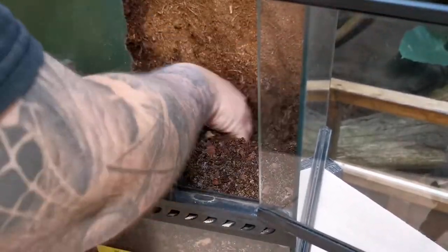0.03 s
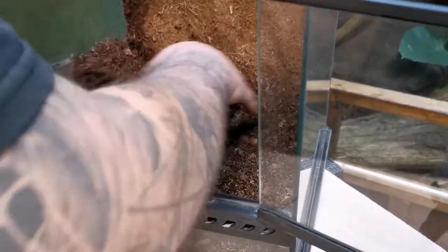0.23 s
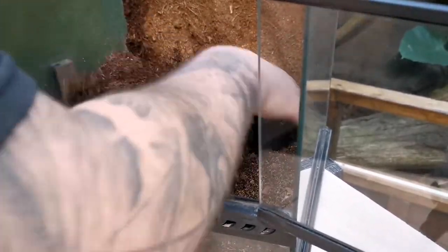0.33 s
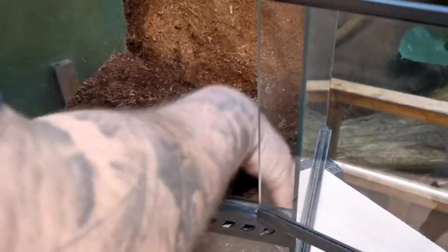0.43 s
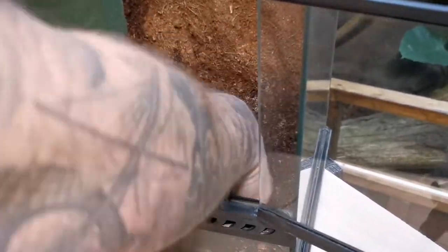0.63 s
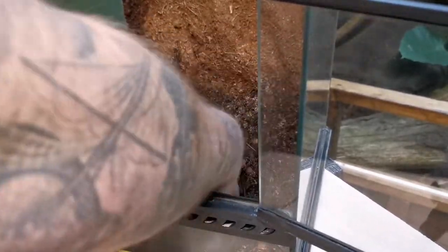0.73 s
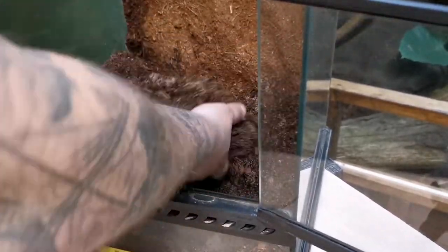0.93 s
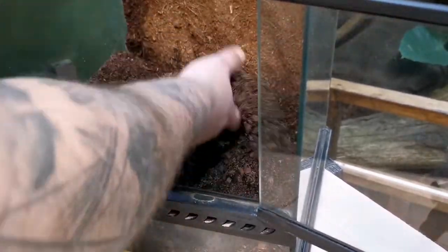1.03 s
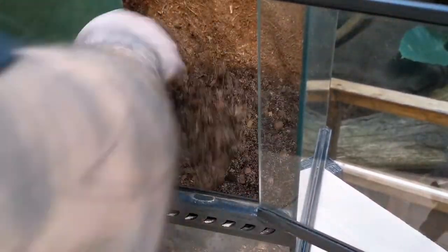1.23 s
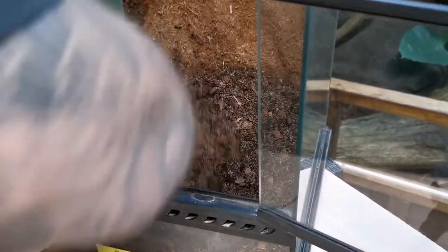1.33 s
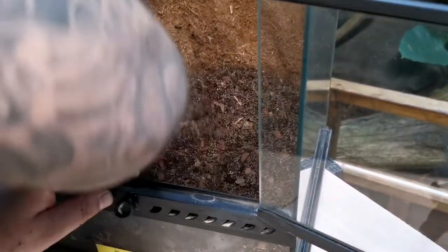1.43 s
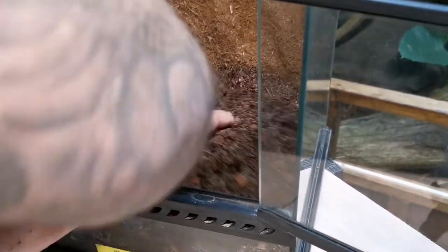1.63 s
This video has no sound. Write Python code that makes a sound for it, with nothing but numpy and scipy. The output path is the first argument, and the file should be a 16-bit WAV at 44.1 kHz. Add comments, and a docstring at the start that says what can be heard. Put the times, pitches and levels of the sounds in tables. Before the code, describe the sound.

Loose soil crunches and hisses under a digging hand, with low knocks against a glass enclosure

```python
"""In a glass enclosure in a small room, a hand close by digs and spreads loose soil, sand and bark chips.
Each stroke is made of random grains: crumbs crunch, sand hisses and the floor pane rumbles.
Thuds ring the enclosure as decaying tones; bark chips snap and scrape in short bursts of grains.
Two handfuls land, and their crumbs patter after them as a fading shower of grains.
Glass resonances, wall reflections, a short room tail and a quiet background surround it all."""
import sys
import numpy as np
from scipy import signal
from scipy.fft import rfft, irfft, next_fast_len
from scipy.io import wavfile

SR = 44100
rng = np.random.default_rng(int(sys.argv[2]) if len(sys.argv) > 2 else 0)


def unload_wav(signal):
    """Save mono or channel-first audio to the path in sys.argv[1] as 16-bit WAV at rate SR, clipped to [-1, 1]."""
    wavfile.write(
        sys.argv[1],
        SR,
        np.round(np.clip(np.atleast_2d(signal).T, -1, 1) * 32767).astype(np.int16),
    )


N = 74970  # length of the scene in samples


def amp(db):
    """Turn decibels into a gain."""
    return 10 ** (np.asarray(db) / 20)


def unit(x):
    """Scale a sound to an average (rms) strength of 1."""
    return x / np.sqrt(np.mean(x ** 2) + 1e-20)


def along(points, hz):
    """Read a value at each frequency from (Hz, value) points, on a log frequency axis."""
    point_hz, value = np.transpose(points)
    return np.interp(np.log(hz + 1), np.log(point_hz + 1), value)


def decay(t, t60):
    """A level that falls by 60 dB in t60 seconds."""
    return np.exp(-np.log(1000) * t / t60)


def struck(start, attack, t60):
    """An envelope that is silent before start (s), then rises and dies away."""
    t = np.maximum(np.arange(N) / SR - start, 0)
    return (1 - np.exp(-t / attack)) * decay(t, t60)


def filtered(x, response):
    """Multiply the spectrum of x by a response, given as a function of frequency."""
    size = next_fast_len(N + SR // 2)  # spare room so that the end does not wrap round
    spectrum = rfft(x, size) * response(np.fft.rfftfreq(size, 1 / SR))
    return irfft(spectrum, size)[..., :N]


def spread(pair):
    """Mix two unrelated signals to left and right: alike in the bass, unrelated in the treble."""
    # How alike left and right are: (frequency [Hz], likeness [0 to 1])
    likeness = [(40, .85), (150, 0.92), (400, 0.95), (1000, 0.8), (2000, 0.72), (4000, 0.31), (7000, 0),
                (14000, 0.019)]

    def mid_and_side(hz):
        angle = np.arccos(np.clip(along(likeness, hz), -1, 1)) / 2
        return np.array([np.cos(angle), np.sin(angle)])

    mid, side = filtered(pair, mid_and_side)
    return np.array([mid + side, mid - side])


def grains(per_s, colour_db):
    """Tiny random contacts of uneven size, coloured by a filter, in stereo at rms 1."""
    scatter_db, pan_scatter = 1.5, 0.12
    hit = rng.random(N) < per_s / SR
    size = amp(scatter_db * np.minimum(rng.exponential(size=N), 4))  # the cap limits rare big grains
    sign = rng.choice([-1, 1], (2, N))
    pan = np.exp(pan_scatter * rng.standard_normal((2, N)))
    pair = hit * size * sign * pan
    return unit(spread(filtered(pair, lambda hz: amp(colour_db(hz)))))


def strokes():
    """The hand ploughs through the soil: crumbs crunch, sand hisses, the pane rumbles."""
    # Hand strokes, one list each, before the trims below:
    # (time [s], crunch level [dB], sand level [dB], rumble level [dB])
    stroke_list = [
        [(0.0, -54.5, -50.5, -39), (0.05, -75.5, -78, -59), (0.11, -62, -65, -51.5), (0.15, -55, -58, -45.5),
         (0.21, -59.5, -56.5, -44.5), (0.24, -48.5, -48, -48.5), (0.272, -61, -54, -60),
         (0.30, -55, -46, -57.5), (0.35, -74, -60, -58), (0.41, -70, -84, -68.5)],
        [(0.50, -66, -59.5, -45), (0.565, -60, -62, -53.5), (0.60, -55, -66, -45), (0.685, -59, -57, -51),
         (0.73, -49, -52.5, -46), (0.81, -53, -46.5, -50.5), (0.855, -46.5, -49.5, -41), (0.89, -49, -49, -55),
         (0.925, -52, -69, -45.5), (1.0, -71.5, -71.5, -78)],
        [(1.03, -79, -87, -69.5), (1.10, -75.5, -78.5, -71.5), (1.15, -68.5, -70.5, -64.5),
         (1.22, -77, -79.5, -74), (1.32, -75.5, -72, -77), (1.36, -63, -69, -60)],
        [(1.46, -60, -68, -48), (1.52, -72, -87, -62), (1.57, -62, -66.5, -56), (1.625, -55, -60, -45),
         (1.67, -52, -56.5, -49.5), (1.7, -57, -60, -55)],
    ]
    # Colours of the three layers, each: (frequency [Hz], level [dB])
    crunch_colour = [(200, -50), (480, 3.5), (680, -1.5), (1200, 0.5), (1800, -2.5), (2600, -4),
                     (3800, -14), (7000, -39), (12000, -52)]
    sand_colour = [(800, -30), (2000, -6), (3000, -2), (4000, 0.5), (4800, -2), (5900, -2), (7200, -7),
                   (10000, -9.5), (15000, -4.5)]
    rumble_colour = [(40, -13.5), (100, -13), (150, -3), (210, -6), (285, 0.5), (380, -6), (480, -12),
                     (660, -15), (900, -29.5), (3000, -62)]
    fade_db_per_s = 356  # how steeply a stroke fades before its first and after its last time
    crunch_db, sand_db, rumble_db = -1, 0.5, -2.5  # trims
    crunch_per_s, sand_per_s, rumble_per_s = 1300, 2600, 1400  # grains per second

    t, level = np.arange(N) / SR, 0
    for rows in stroke_list:
        times, *columns = np.transpose(rows)
        fade = fade_db_per_s * abs(t - np.clip(t, times[0], times[-1]))
        level = level + amp([np.interp(t, times, column) - fade for column in columns])
    crunch = amp(crunch_db) * grains(crunch_per_s, lambda hz: along(crunch_colour, hz))
    sand = amp(sand_db) * grains(sand_per_s, lambda hz: along(sand_colour, hz))
    rumble = amp(rumble_db) * grains(rumble_per_s, lambda hz: along(rumble_colour, hz))
    return level[0] * crunch + level[1] * sand + level[2] * rumble


def still_room():
    """The quiet background: steady noise, coloured and spread over left and right."""
    # Colour of the background: (frequency [Hz], level [dB])
    background_colour = [(20, -1.5), (45, 4), (90, -11), (160, -8), (300, -27), (1000, -26), (3000, -26.5),
                         (7000, -29), (15000, -23)]
    noise = rng.standard_normal((2, N))
    coloured = filtered(noise, lambda hz: amp(along(background_colour, hz)))
    return amp(-63.5) * unit(spread(coloured))


def thuds():
    """Hand and soil strike the enclosure; a softer contact rings only its low tones."""
    # Blows: (time [s], level [dB], cut-off of the contact [Hz]); a lower cut-off is a softer contact
    blows = [(0.0734, -40, 387), (0.1537, -17, 152), (0.1615, -24, 221), (0.2108, -37.5, 290),
             (0.289, -43.5, 298), (0.4242, -25.5, 790), (0.4316, -23.5, 1050), (0.4489, -33, 1310),
             (0.5875, -37.5, 450), (0.6076, -50.5, 416), (0.712, -43, 445), (1.125, -62, 390),
             (1.38, -18, 264), (1.3987, -28.5, 280), (1.599, -43, 430)]
    # Ringing tones (modes) of the enclosure: (frequency [Hz], level [dB], time to fall 60 dB [s])
    modes = [(151.4, -14.5, 0.16), (180.7, -8, 0.13), (272.7, 4, 0.069), (306.3, -5.5, 0.16),
             (373, -0.5, 0.084), (475.3, -7.5, 0.17), (537, -19.5, 0.22), (668, -2, 0.063),
             (717.6, -10.5, 0.16), (780, -11.5, 0.12), (896, -13, 0.28), (1047, -16.5, 0.14),
             (1132, -14, .1), (1300, -15, 0.068)]
    attack_s, contact_steepness = 0.0023, 7
    phase_spread = 0.085  # radians, sets left and right slightly apart
    radiates_hz = 151  # the panes radiate little below this

    out, t = np.zeros((2, N + SR)), np.arange(SR // 2) / SR
    phases = phase_spread * rng.standard_normal((len(modes), 1, 1)) * np.array([[1], [-1]])
    for start, db, soft_hz in blows:
        first = round(start * SR)
        for (hz, mode_db, t60), phase in zip(modes, phases):
            gain = amp(db + mode_db) / np.hypot(1, (hz / soft_hz) ** contact_steepness)
            envelope = decay(t, t60) * (1 - np.exp(-t / attack_s))
            ring = np.cos(2 * np.pi * hz * t + phase) * envelope
            out[:, first:first + len(t)] += gain * ring
    highpass = signal.butter(2, radiates_hz, "highpass", fs=SR, output="sos")
    return signal.sosfilt(highpass, out[:, :N])


def chips():
    """Bark chips snap, scrape and land: each is a short burst of slips around its own pitch."""
    # Chip sounds: (time [s], level [dB], pitch [Hz], width [octaves], attack [s], time to fall 60 dB [s])
    chip_list = [(0.143, -40.5, 2740, 0.14, 0.0019, 0.024), (0.236, -24.5, 6120, .25, 0.00029, 0.01),
                 (0.243, -56, 5500, 0.36, 0.0025, .06), (0.2837, -36, 5740, 0.48, 0.0031, 0.075),
                 (0.4238, -32, 3500, 0.55, 0.00013, 0.025), (0.4304, -30.5, 4800, 0.44, 0.00066, 0.042),
                 (0.4435, -35, 4400, 0.91, 0.00085, .04), (0.7127, -37.5, 1810, 0.18, 0.0015, 0.05),
                 (0.755, -30, 3910, 0.056, 0.00092, 0.02), (0.7604, -30, 4600, 0.27, 0.0024, 0.054),
                 (0.765, -31.5, 3230, 0.21, 0.0012, 0.05), (0.7742, -29.5, 3950, 0.075, 0.0011, 0.047),
                 (0.788, -34.5, 5370, 0.74, 0.00079, 0.023), (0.848, -32, 2670, 0.32, 0.0071, 0.061),
                 (0.906, -38.5, 820, 0.6, 0.0015, 0.051), (1.022, -54.5, 3500, 0.68, 0.0011, 0.026),
                 (1.088, -58, 2090, .2, 0.0036, 0.046), (1.3632, -36.5, 5660, 0.43, 0.0014, 0.039),
                 (1.3775, -44.5, 2600, .9, 0.00089, .035), (1.402, -41, 5600, 0.45, 0.0005, .025),
                 (1.419, -41, 3400, .6, 0.00082, .025)]
    slips_per_s = 3200
    out = np.zeros((2, N))
    for start, db, pitch, octaves, attack, t60 in chip_list:

        def ring_db(hz):
            distance = np.log2((hz + 1) / pitch) / octaves
            return -20 * np.log10(1 + distance ** 2 / 2)

        out += amp(db) * struck(start, attack, t60) * grains(slips_per_s, ring_db)
    return out


def spills():
    """Loose crumbs patter as they settle after each handful."""
    # Showers of crumbs: (time [s], level [dB], time to fall 60 dB [s])
    showers = [(0.43, -40.5, 0.28), (1.372, -45.5, 0.31)]
    # Colour of the patter: (frequency [Hz], level [dB])
    patter_colour = [(200, -10), (600, -3.5), (1400, 1.5), (2700, -1), (4000, -3), (6000, -2), (7500, -2),
                     (15000, -14.5)]
    crumbs_per_s, attack_s = 2200, 0.004
    level = sum(amp(db) * struck(start, attack_s, t60) for start, db, t60 in showers)
    return level * grains(crumbs_per_s, lambda hz: along(patter_colour, hz))


def glass(x):
    """Grit on the glass excites its narrow high resonances, added to the sound."""
    # Resonances of the glass, before the trim below: (frequency [Hz], width [Hz], level [dB])
    resonances = [(2874, 60, -0.5), (3877, 48, -2.5), (4120, 59, -10), (4250, 16, -35.5), (4830, 32, -18),
                  (5520, 20, -7), (5710, 460, -2.5)]
    trim_db = -0.5

    def ring(hz):
        total = 0
        for centre, width, db in resonances:
            damping = 1j * hz * width
            total = total + amp(db) * damping / (centre * centre - hz * hz + damping)
        return total

    return x + amp(trim_db) * filtered(x, ring)


def walls(x):
    """The glass walls throw back a few quick copies, some of them upside down."""
    count, reach_s, copy_db = 8, 0.012, -17.5  # copy_db is relative to the direct sound
    delay = rng.uniform(0, reach_s, (count, 1))
    gain = amp(copy_db) * rng.choice([-1, 1], (count, 1))
    loudness = np.sqrt(1 + np.sum(gain ** 2))  # dividing by this keeps the strength about the same

    def reflections(hz):
        copies = gain * np.exp(-2j * np.pi * hz * delay)
        return (1 + np.sum(copies, axis=0)) / loudness

    return filtered(x, reflections)


def room(x):
    """The answer of the glass walls and the room: a noise tail, each frequency dying at its own speed."""
    # Dying away of the tail: (frequency [Hz], time to fall 60 dB [s])
    tail_t60 = [(150, 0.23), (1000, 0.25), (4000, 0.28), (12000, 0.36)]
    noise = rng.standard_normal((2, SR // 2))
    hz, t, spectrum = signal.stft(noise, SR, nperseg=256)
    fading = spectrum * decay(t, along(tail_t60, hz)[:, None])
    tail = signal.istft(fading, SR, nperseg=256)[1]
    tail = tail / np.linalg.norm(tail[0])
    tail = np.pad(tail, ((0, 0), (SR // 400, 0)))  # the tail starts 2.5 ms late
    return spread(signal.fftconvolve(x, tail, axes=1)[:, :N])


def scene():
    """Soil and enclosure in the quiet room, heard mostly a little to the right."""
    # Balance between the sides: (frequency [Hz], left over right [dB])
    balance = [(40, 3), (120, -1.9), (2500, -1.95), (4500, -2.5), (7500, 1.5), (15000, 0.5)]
    room_db, thud_room_db = -9, -7.5
    background = still_room()
    loose = walls(glass(strokes() + chips() + spills()))
    knocks = thuds()
    near = loose + amp(room_db) * room(loose) + knocks + amp(thud_room_db) * room(knocks)
    # half of the difference goes to each side
    leaning = filtered(near, lambda hz: amp(np.outer([0.5, -0.5], along(balance, hz))))
    return leaning + background


def record(dry):
    """Overall tone: fuller bass, treble falling steeply above about 7 kHz, nothing above 15.1 kHz."""
    # Overall tone: (frequency [Hz], level [dB])
    tone = [(20, 3), (6500, 1), (7600, -3), (8500, -13), (11000, -19.5), (15000, -26)]
    top_hz = 15100
    return filtered(dry, lambda hz: amp(along(tone, hz)) * (hz < top_hz))


dry = scene()
out = record(dry)
unload_wav(out)
```